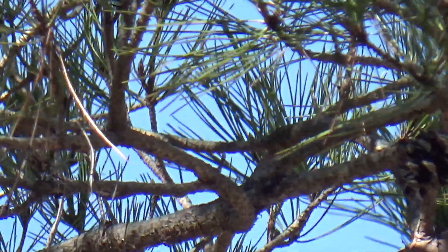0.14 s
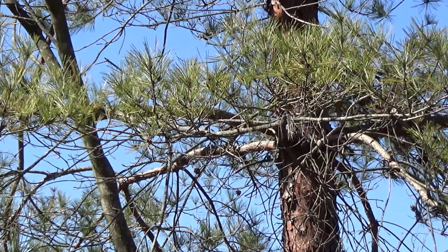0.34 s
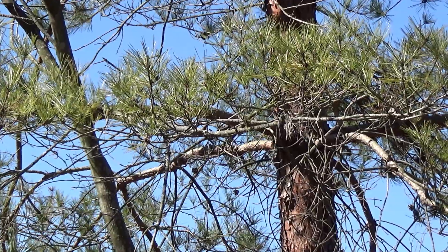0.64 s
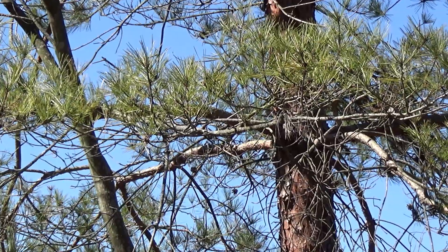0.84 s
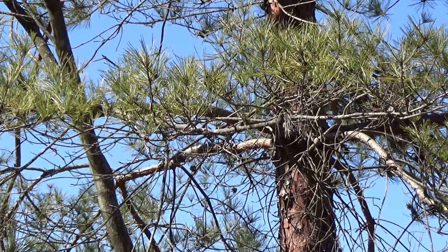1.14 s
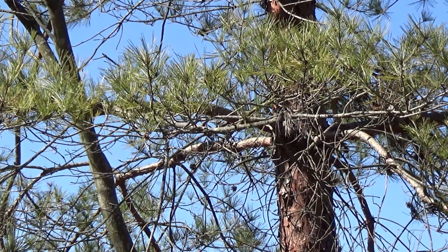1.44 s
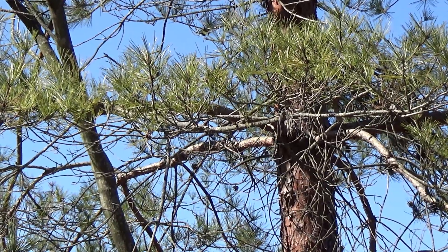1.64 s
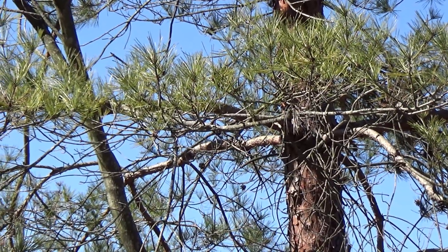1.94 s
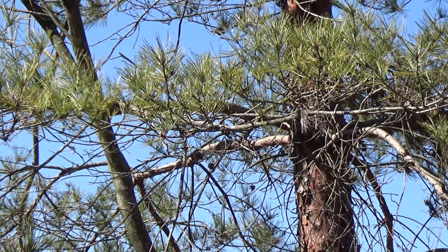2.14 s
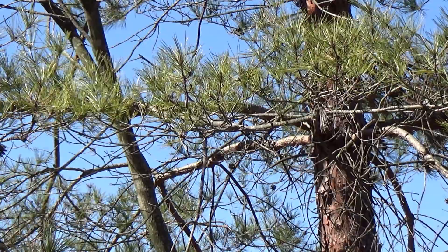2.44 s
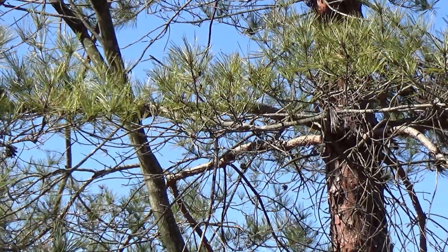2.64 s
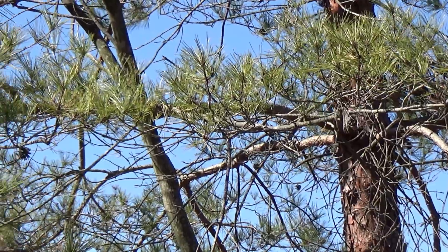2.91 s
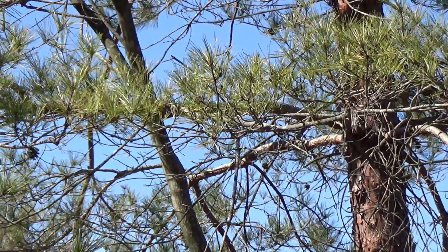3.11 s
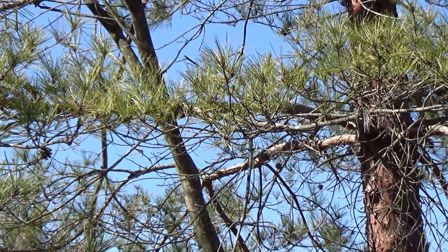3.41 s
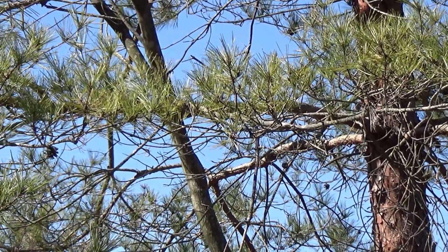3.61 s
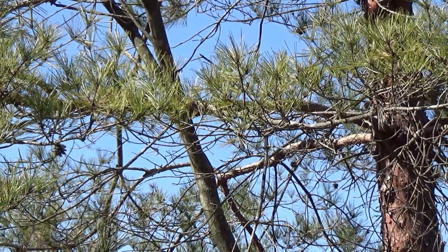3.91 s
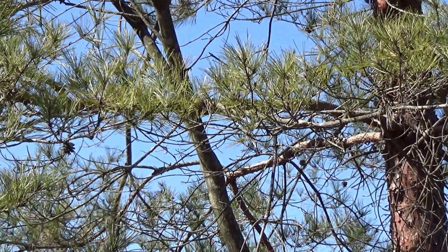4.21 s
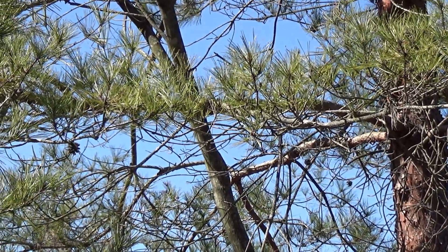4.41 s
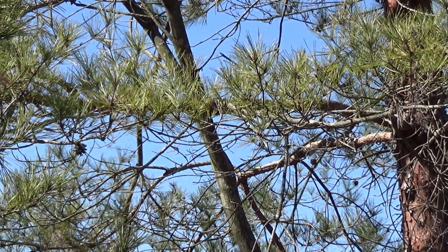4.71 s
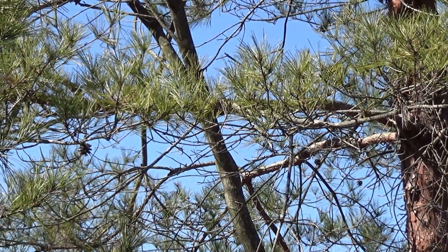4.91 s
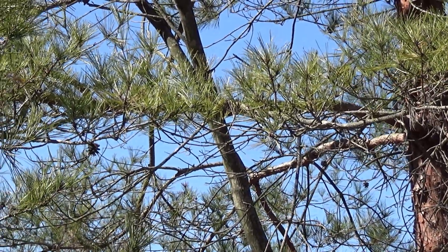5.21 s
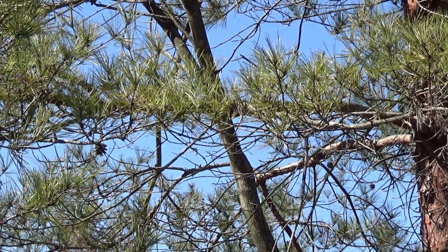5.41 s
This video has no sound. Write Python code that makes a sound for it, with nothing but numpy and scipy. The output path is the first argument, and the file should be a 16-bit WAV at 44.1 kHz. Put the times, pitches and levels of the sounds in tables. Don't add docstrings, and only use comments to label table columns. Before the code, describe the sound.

Small birds among pines: one buzzes thin, very high notes on the left while another sings quick runs of rising chirps over soft wind.

```python
import sys
import numpy as np
from scipy import signal
from scipy.io import wavfile
from scipy.ndimage import uniform_filter1d

SR = 44100
rng = np.random.default_rng(int(sys.argv[2]) if len(sys.argv) > 2 else 0)


def invert_db(x):
    u = np.asarray(x, float) / 20
    return 10 ** u


def generate_wav(sig):
    pcm = np.round(np.clip(np.atleast_2d(sig).T, -1, 1) * 32767).astype(np.int16)
    wavfile.write(sys.argv[1], SR, pcm)


N = 244755


def evened(x):
    return x / np.sqrt(np.mean(x ** 2) + 1e-20)


def read(points, hz):
    f, value = np.transpose(points)
    return np.interp(np.log(hz + 1), np.log(f + 1), value)


def add(mix, s, sound):
    part = mix[..., round(s * SR):][..., :sound.shape[-1]]
    part += sound[..., :part.shape[-1]]


def panned(x, pan_db):
    return x * invert_db([[pan_db / 2], [-pan_db / 2]])


def wobble(count, hz):
    size = round(SR / hz)
    noise = rng.standard_normal(count + 2 * size)
    smooth = uniform_filter1d(uniform_filter1d(noise, size), size)
    return evened(smooth[size:-size])


def airy(colour_db, side_db, patchy_db, size=512):
    hop = size // 4
    frames, hz = N // hop + 5, np.fft.rfftfreq(size, 1 / SR)
    a, b, c, d, patches = rng.standard_normal((frames, len(hz), 5)).T
    patches = evened(uniform_filter1d(uniform_filter1d(patches, 8, 0), 20, 1))
    mid = a + 1j * b
    side = invert_db(side_db(hz))[:, None] * (c + 1j * d)
    z = np.array([mid + side, mid - side])
    z *= invert_db(colour_db(hz[:, None], np.arange(frames) * hop / SR) + patchy_db * patches)
    return evened(signal.istft(z, nperseg=size, noverlap=size - hop)[1][:, :N])


def wind():
    # f/Hz, level/dB per Hz
    hum_colour = [(15, -61), (25, -17), (140, -12.5), (290, -10.5), (369, -9), (445, -9), (685, -4),
                  (743, -5), (921, -6.5), (1310, -10), (1710, -14.5), (2300, -19.5), (6400, -26.5),
                  (9330, -27.5), (15600, -32)]
    # f/Hz, side minus mid/dB
    width = [(60, -33), (130, -38), (290, -18), (640, -11.5), (1410, -5), (3100, -3), (6820, -7),
             (15000, -25)]
    # t/s, level/dB
    breeze = [(.3, -58.5), (1.16, -57), (1.73, -58.5), (2.1, -57.5), (3.5, -56), (4.2, -57.3), (5.2, -58),
              (5.55, -58)]
    # t/s, rumble boost/dB
    buffets = [
        (.4, 1.5),
        (2.0, 2.9),
        (3.58, 2.2),
        (4.16, 8.4),
        (4.56, 8.6),
    ]
    calm_db, buffet_s = -3, 0.14

    def colour_db(hz, t):
        rumble_db = calm_db + sum(db * np.exp(-((t - s) / buffet_s) ** 2) for s, db in buffets)
        return read(hum_colour, hz) + rumble_db / (1 + (hz / 200) ** 4)

    noise = airy(colour_db, lambda hz: read(width, hz), patchy_db=1.0, size=2048)
    return invert_db(np.interp(np.arange(N) / SR, *np.transpose(breeze)) + 1.76) * noise


def needles():
    # f/Hz, level/dB per Hz
    hiss_colour = [(2500, -18), (4000, -20.5), (6000, -13), (8500, -7), (10500, -14.5), (13000, -25),
                   (16000, -26)]
    # t/s, level/dB
    rustle = [(.3, -83), (.45, -77.5), (1.7, -81.5), (2.35, -71), (3.63, -70.5), (4.09, -71.5), (4.5, -70),
              (5.03, -68.5), (5.14, -64.5), (5.33, -65.5), (5.55, -71.5)]
    crackles_per_s, crackle_db = 260, 3.5
    s, hiss_db = np.transpose(rustle)
    noise = airy(lambda hz, t: read(hiss_colour, hz), lambda hz: -13. + 0 * hz, patchy_db=1.1, size=256)
    strength = invert_db(crackle_db * np.minimum(rng.exponential(1, N), 3))
    snaps = (rng.random(N) < crackles_per_s / SR) * strength
    crackle = evened(1 + 0.29 * signal.lfilter([1], [1, -.985], snaps))
    level_db = np.interp(np.arange(N) / SR, s, hiss_db) + 9 + 0.94 * wobble(N, 88)
    return invert_db(level_db) * crackle * noise


def scooped(hz, start_hz, end_hz, quick=0.0022):
    t = np.arange(len(hz)) / SR
    return hz - start_hz * np.exp(-t / quick) - end_hz * np.exp(-t[::-1] / quick)


def buzzer():
    # t/s, length/s, strongest line f/Hz, flutter rate f/Hz, level/dB
    buzzes = [(.318, 0.12, 8085, 392, -49), (0.499, 0.099, 8450, 379, -45.5),
              (0.663, 0.092, 8670, 367, -43.5), (.824, 0.09, 8670, 368, -47),
              (0.986, 0.086, 8690, 320, -47.5), (2.082, 0.13, 8670, 332, -51),
              (2.292, 0.11, 8970, 313, -43.5), (2.473, .125, 8970, 345, -46.5),
              (2.666, 0.12, 9055, 354, -47.5), (2.859, 0.13, 9055, 365, -46),
              (3.092, 0.087, 8975, 315, -47)]
    low_lines = (-40, -21, -3.5, -11, 0, -7, -29)
    high_lines = (-18, -2, -5, -6.5, 0, -8.5, -29)
    low_hz, high_hz = 8085, 9055
    climb_hz, swell_db, throb_db = 126.2, 2.5, 0.2
    out = np.zeros(N)
    for s, length, middle_hz, flutter_hz, level_db in buzzes:
        share = np.linspace(0, 1, round(length * SR))
        count = len(share)
        hz = middle_hz + climb_hz * (share - .5)
        db = level_db + swell_db * (np.sin(np.pi * share) - .7) + throb_db * wobble(count, 40)
        height = (middle_hz - low_hz) / (high_hz - low_hz)
        lines_db = np.array(low_lines) + height * np.subtract(high_lines, low_lines)
        lines_db = lines_db - 10 * np.log10(np.sum(invert_db(lines_db) ** 2))
        carrier = np.cumsum(scooped(hz, 300, 450) * (1 + .0025 * wobble(count, 250))) / SR
        beat = np.cumsum(flutter_hz * (1 + .04 * wobble(count, 60))) / SR
        note = np.zeros(count)
        for step, line_db in enumerate(lines_db, start=-4):
            phase = 2 * np.pi * (carrier + step * beat) + np.pi * (step == -2)
            note += invert_db(line_db + 2.0 * wobble(count, 62)) * np.sin(phase)
        note *= 1 + .2 * wobble(count, 1200)
        add(out, s, np.sqrt(2) * invert_db(db) * note * signal.windows.tukey(count, .11))
    return out


def trunks(x, near_db, tail_db, t60, likeness=0.43):
    length = SR // 2
    t = np.arange(length) / SR
    taps = np.zeros((2, length))
    at = np.arange(300, length - 20, 20) + rng.integers(0, 20, (2, (length - 301) // 20))
    np.put_along_axis(taps, at, rng.choice([-1., 1.], at.shape), 1)
    taps *= invert_db(-60 * t / t60)
    taps *= np.minimum(t / 0.006, 1)
    taps *= invert_db(tail_db) / np.linalg.norm(taps[0])
    shared, apart = taps[0], (1 - likeness) * taps[1]
    taps = np.array([shared + apart, shared - apart])
    near = rng.integers(30, 1400, 7)
    taps[:, near] += invert_db(near_db - near / 93.0) * rng.choice([-1., 1.], 7)
    return signal.fftconvolve(np.atleast_2d(x), taps, axes=1)[:, :N]


def tone(hz, db, edge, unsteady):
    turns = np.cumsum(hz * (1 + unsteady * wobble(len(hz), 164))) / SR
    t = np.arange(len(hz)) / SR
    ends = np.sin(np.pi / 2 * np.clip(np.minimum(t, t[::-1]) / edge, 0, 1)) ** 2
    return np.sqrt(2) * invert_db(db) * ends * np.sin(2 * np.pi * (turns + rng.random()))


def whistlers():
    # start t/s, end t/s, start f/Hz, end f/Hz, level/dB
    ahead = [
        (.43, .49, 8130, 8040, -68),
        (.614, .67, 8420, 8500, -72),
        (.915, .965, 8720, 8710, -63),
        (2.14, 2.301, 8976, 8910, -57.5),
        (2.58, 2.654, 8950, 8840, -59),
        (2.8, 2.86, 8850, 8800, -61),
        (3.54, 3.57, 7300, 7340, -49),
        (3.574, 3.6, 6800, 7000, -48),
        (3.96, 4.06, 8250, 8120, -73),
    ]
    # start t/s, end t/s, start f/Hz, end f/Hz, level/dB
    on_left = [(.763, .82, 7690, 7690, -77), (1.457, 1.5, 8250, 8220, -74), (2.735, 2.864, 8350, 8280, -54),
               (3.0, 3.098, 8740, 8850, -67), (3.077, 3.243, 8140, 7980, -58.5),
               (3.203, 3.302, 8800, 8900, -70), (3.31, 3.4, 8060, 8130, -62),
               (3.406, 3.557, 7960, 8040, -63.5), (3.55, 3.7, 9010, 9100, -70),
               (3.75, 3.785, 7200, 7550, -61), (3.782, 3.82, 7100, 6990, -58)]
    out = np.zeros((2, N))
    for rows, pan_db in ((ahead, 2.3), (on_left, 7.5)):
        for start, end, start_hz, end_hz, db in rows:
            hz = np.linspace(start_hz, end_hz, round((end - start) * SR))
            whistle = tone(hz, db + 2.0 * wobble(len(hz), 90), 0.01, unsteady=0.00366)
            add(out, start, panned(whistle, pan_db))
    return out


def twigs():
    # t/s, peak level/dB, left minus right/dB
    ticks = [(1.3354, -49, -5), (3.97, -48, 4.5), (4.0766, -52, 8), (4.183, -47, -4), (4.1962, -46, -4),
             (4.2987, -46, -6), (4.3916, -43, -6), (4.498, -42.5, -4), (5.0893, -47, -.4),
             (5.2324, -58, .4), (5.308, -44, 0), (5.367, -44, -5), (5.3794, -47, -5)]
    # t/s, peak level/dB, f/Hz, left minus right/dB, t60/s
    knocks = [
        (1.074, -58, 6200, 11, 0.057),
        (3.03, -57, 5500, 0, .02),
        (3.811, -52.5, 2790, 0, 0.033),
        (4.661, -54.5, 3000, 1.5, 0.06),
        (4.655, -54, 9600, 0, .07),
        (4.668, -50.5, 9200, 0, 0.12),
        (5.364, -50, 6500, 0, 0.024),
    ]
    tick_hz, tick_t60 = 8900, 0.008
    out, t = np.zeros((2, N)), np.arange(1500) / SR
    strikes = [(s, db, tick_hz, pan_db, tick_t60) for s, db, pan_db in ticks]
    for s, db, hz, pan_db, t60 in [*strikes, *knocks]:
        band = signal.butter(2, [hz * 0.78, hz * 1.14], "band", fs=SR, output="sos")
        puff = evened(signal.sosfilt(band, rng.standard_normal(len(t))))
        attack = np.minimum(t / 0.00043, 1)
        add(out, s, panned(invert_db(db - 60 * t / t60) * puff * attack, pan_db))
    return out


def sung(hz, db, edge, overtone_db):
    effort_db = 0.22 * (db + 40.5)
    octave_db = db + effort_db + overtone_db - np.maximum(hz - 6150, 0) / 45 + 3.0 * wobble(len(hz), 58)
    return tone(hz, db, edge, unsteady=.003) + tone(2 * hz, octave_db, edge, unsteady=.003)


def chirp(top_hz, rise_db, top_db, rise_hz):
    chirp_s = 0.032
    t = np.arange(0, chirp_s, 1 / SR)
    ease_s = .0105 + .013 * (7000 - top_hz) * 0.00078
    left = np.exp(-t / ease_s)
    climb = rise_hz * (left - left[-1]) / (1 - left[-1])
    hz = scooped(top_hz - 70 - climb, 350, 430, quick=0.0014)
    steps_db = [rise_db - 16, rise_db, rise_db, top_db, top_db - 6]
    db = np.interp(t / chirp_s, [0, .17, .42, .72, 1], steps_db)
    return sung(hz, db + 0.52 * wobble(len(t), 160), 0.0029, overtone_db=-28.5)


def triller():
    # t/s, length/s, dip f/Hz, crest f/Hz, level/dB
    leads = [
        (1.65, .09, 7115, 7850, -33.5),
        (3.027, 0.095, 7600, 8060, -44),
        (3.29, .08, 7200, 7660, -53.5),
        (3.393, 0.0805, 6740, 7250, -31),
        (4.267, 0.064, 6950, 7350, -53),
        (4.575, 0.082, 6660, 7080, -36),
    ]
    # share of the note, height from dip 0 to crest 1, level/dB
    waver = [
        (0, -0.39, -20),
        (.09, 0.37, -9.5),
        (.25, 0.663, -7.5),
        (.39, 1, -0.5),
        (.51, 0.066, -4),
        (.62, 0.095, 1.5),
        (.71, .4, -5.5),
        (.82, 0.317, -1.5),
        (1, -0.18, -12),
    ]
    # t/s, f/Hz, level/dB
    slide = [
        (2.341, 5700, -46),
        (2.355, 5850, -48),
        (2.362, 6250, -50),
        (2.373, 6810, -39),
        (2.388, 6780, -41),
        (2.397, 6600, -56),
        (2.404, 6860, -41),
        (2.417, 6780, -38),
        (2.428, 6100, -54),
    ]
    # t/s, top f/Hz, level while rising/dB, level at the top/dB
    chirps = [(1.75, 7070, -47, -38), (1.8053, 6950, -43.5, -38), (1.8607, 6930, -42.5, -37.5),
              (1.915, 6890, -42, -39), (1.969, 6920, -44, -33), (2.022, 6690, -43.5, -40),
              (2.0794, 6880, -41, -36.5), (2.1337, 6700, -42.5, -38), (2.196, 6620, -41, -43),
              (2.4433, 6710, -42.5, -42), (2.4994, 6605, -41, -43.5), (3.496, 6740, -39, -34),
              (3.553, 6740, -38.5, -40.5), (3.6078, 6660, -38, -41), (3.672, 6620, -40.5, -40),
              (3.7317, 6620, -40, -45), (3.787, 6520, -40.5, -40), (3.8448, 6450, -42, -39.5),
              (4.6744, 6740, -42, -48), (4.7329, 6600, -42, -46), (4.7866, 6500, -45, -42.5),
              (4.846, 6430, -45.5, -40.5)]
    # t/s, top f/Hz, level while rising/dB, level at the top/dB
    far_chirps = [
        (3.135, 7200, -56.5, -61),
        (3.19, 7090, -54.5, -59),
        (3.256, 6850, -59, -56),
        (4.356, 6760, -61, -65),
        (4.409, 6650, -61, -70),
    ]
    out = np.zeros(N)
    at, height, shape_db = np.transpose(waver)
    for s, length, dip_hz, crest_hz, level_db in leads:
        share = np.linspace(0, 1, round(length * SR))
        hz = dip_hz + (crest_hz - dip_hz) * uniform_filter1d(np.interp(share, at, height), size=70)
        db = level_db + np.interp(share, at, shape_db) + 0.64 * wobble(len(hz), 160)
        add(out, s, sung(scooped(hz, 180, 400, quick=0.0032), db, 0.0014, overtone_db=-29))
    s, hz, db = np.transpose(slide)
    t = np.arange(s[0], s[-1], 1 / SR)
    glide_hz = uniform_filter1d(np.interp(t, s, hz), size=70)
    add(out, s[0], sung(glide_hz, np.interp(t, s, db), 0.0018, overtone_db=-25))
    for rows, rise_hz in ((chirps, 1520), (far_chirps, 857)):
        for s, top_hz, rise_db, top_db in rows:
            add(out, s - .0004, chirp(top_hz, rise_db, top_db, rise_hz))
    return out


def scene():
    buzz, trill, far = buzzer(), triller(), whistlers()
    birds = panned(buzz + trunks(buzz, near_db=-11.0, tail_db=-17.0, t60=0.85), 3.8)
    scattered = signal.sosfilt(signal.butter(3, 6300, "high", fs=SR, output="sos"), trill)
    birds += panned(trill + trunks(scattered, near_db=-10.5, tail_db=-8, t60=0.33), -0.5)
    birds += far + trunks(far, near_db=-12, tail_db=-16, t60=.3)
    return invert_db(-0.5) * birds + wind() + needles() + twigs()


def band_limit(x):
    return signal.sosfilt(signal.butter(12, 15710, fs=SR, output="sos"), x)


def record(dry):
    fade_start_s, fade_end_s = 0.25, 0.29
    thin = signal.sosfilt(signal.butter(2, 50, "high", fs=SR, output="sos"), dry)
    top_cut = signal.firwin(511, 15720, window=("kaiser", 9), fs=SR)
    thin = signal.oaconvolve(thin, top_cut[None], "same")
    fade = np.clip((np.arange(N) / SR - fade_start_s) / (fade_end_s - fade_start_s), 0, 1) ** 2.9
    return band_limit(thin * fade)


dry = scene()
out = record(dry)
generate_wav(out)
```